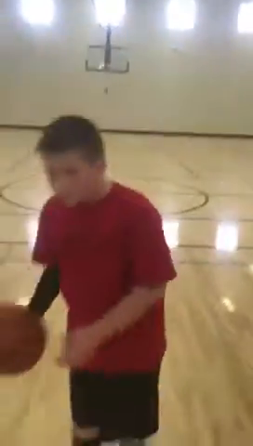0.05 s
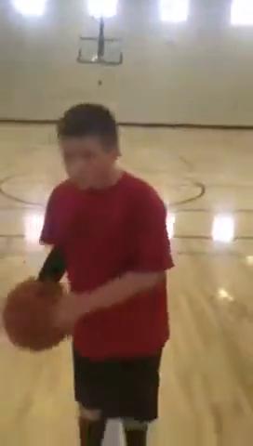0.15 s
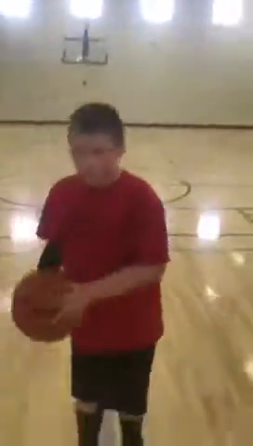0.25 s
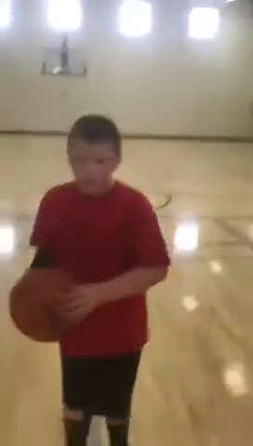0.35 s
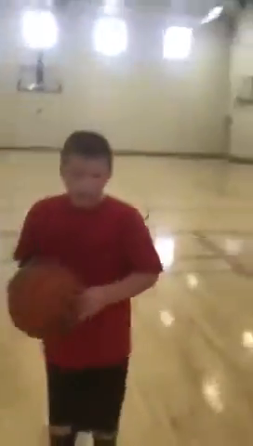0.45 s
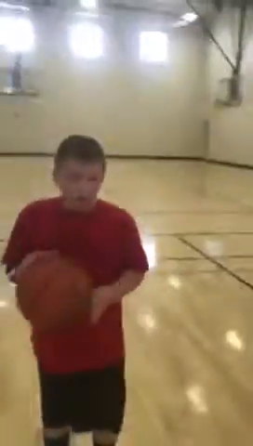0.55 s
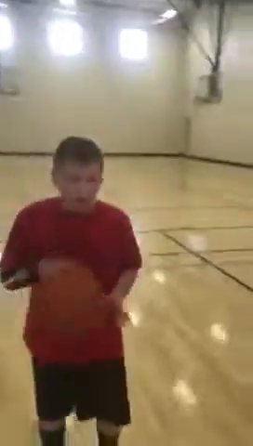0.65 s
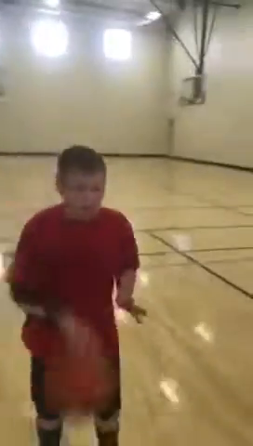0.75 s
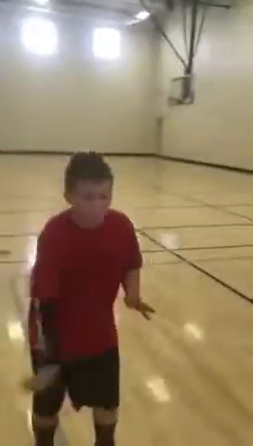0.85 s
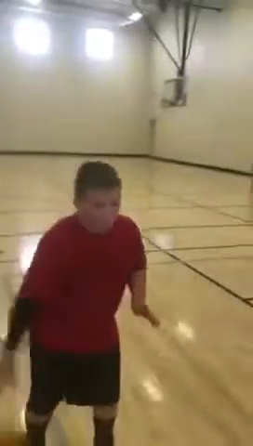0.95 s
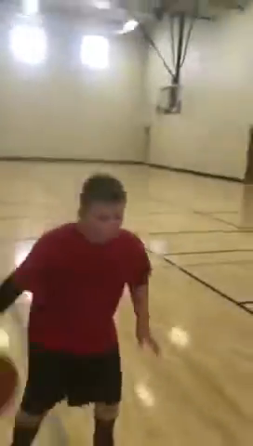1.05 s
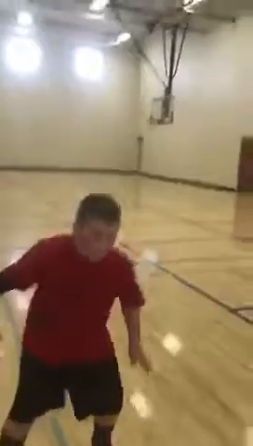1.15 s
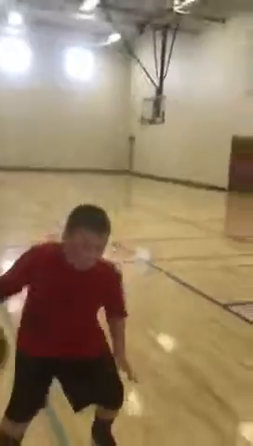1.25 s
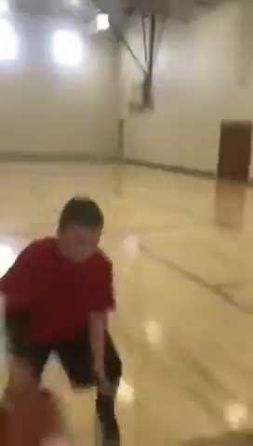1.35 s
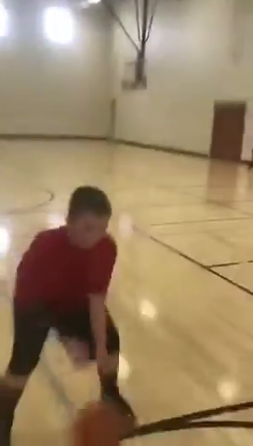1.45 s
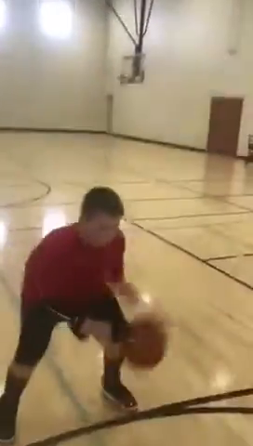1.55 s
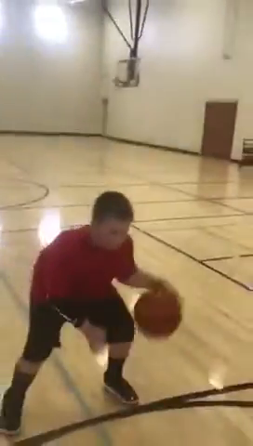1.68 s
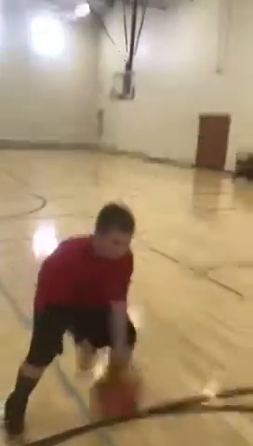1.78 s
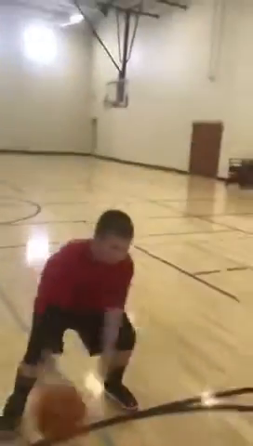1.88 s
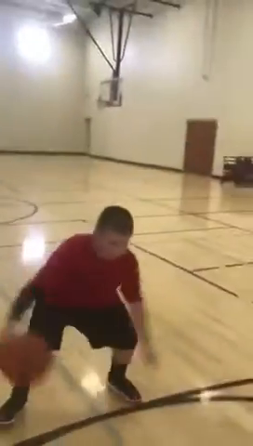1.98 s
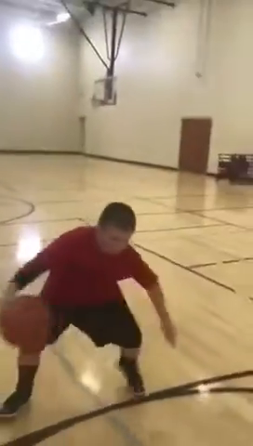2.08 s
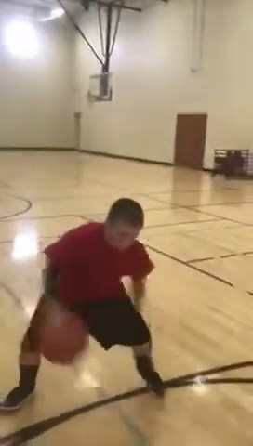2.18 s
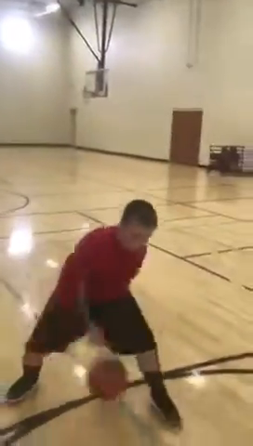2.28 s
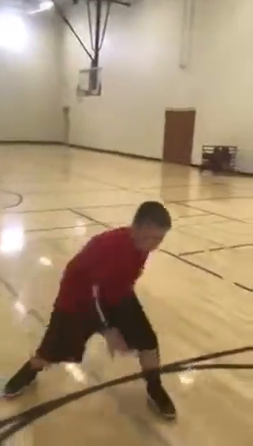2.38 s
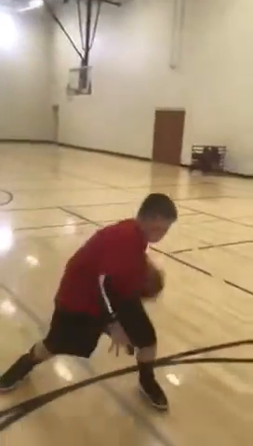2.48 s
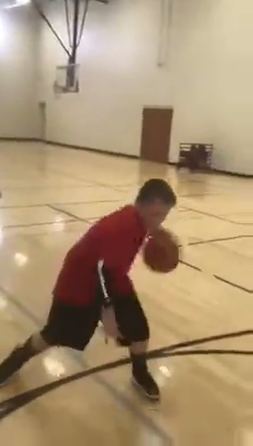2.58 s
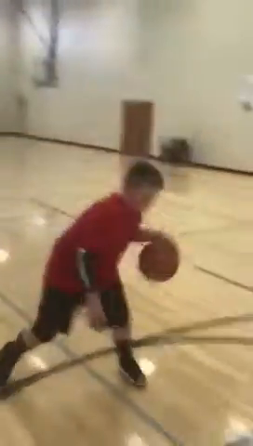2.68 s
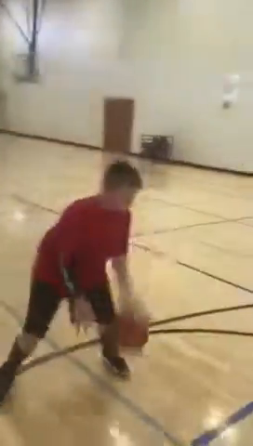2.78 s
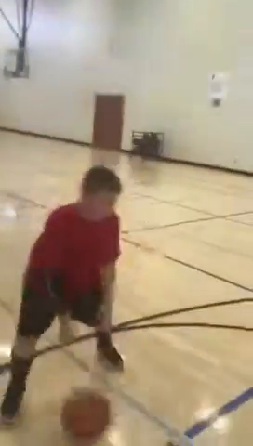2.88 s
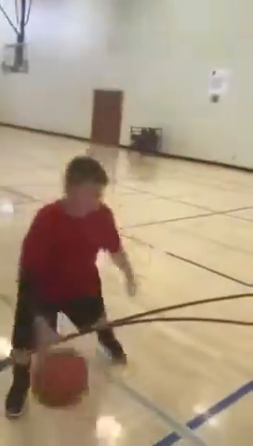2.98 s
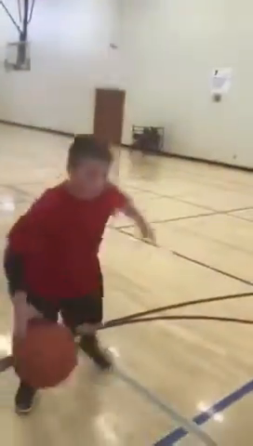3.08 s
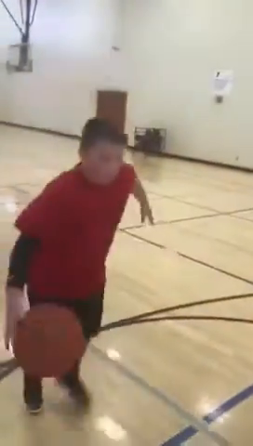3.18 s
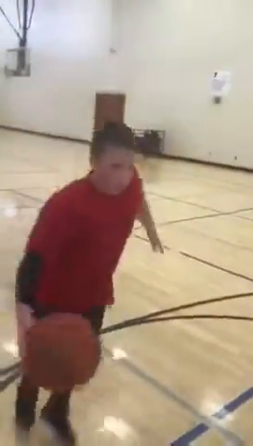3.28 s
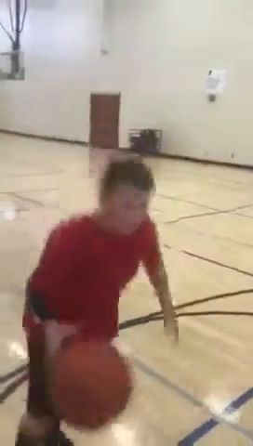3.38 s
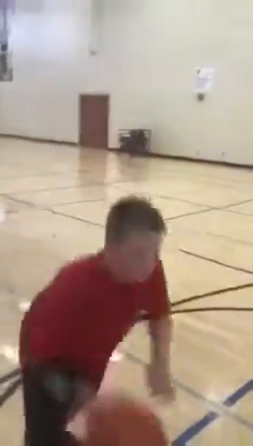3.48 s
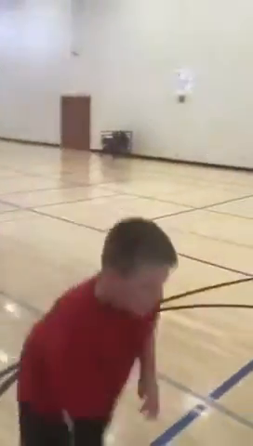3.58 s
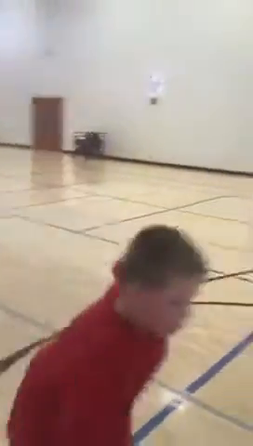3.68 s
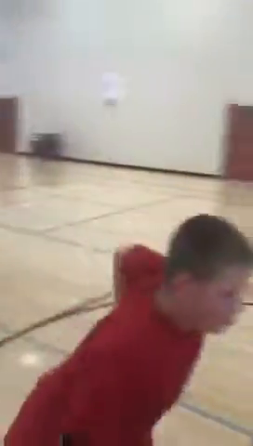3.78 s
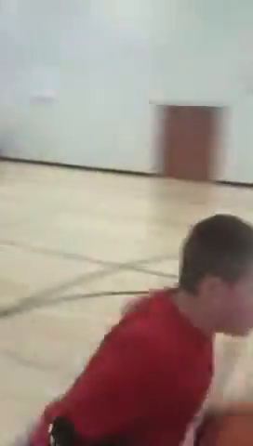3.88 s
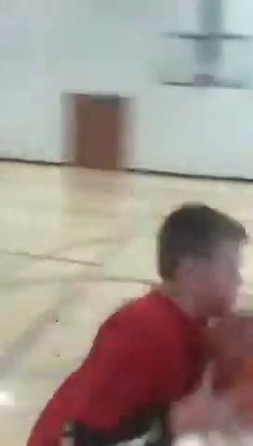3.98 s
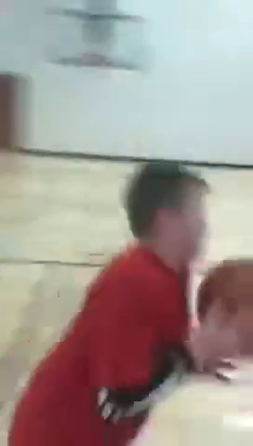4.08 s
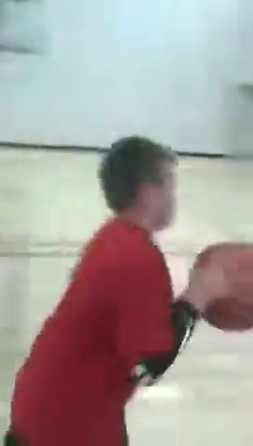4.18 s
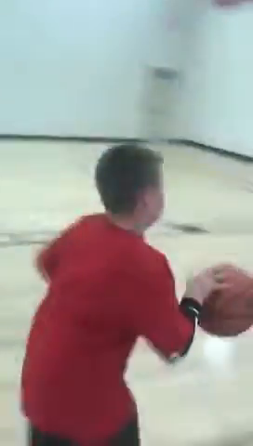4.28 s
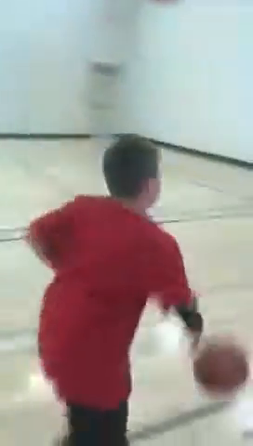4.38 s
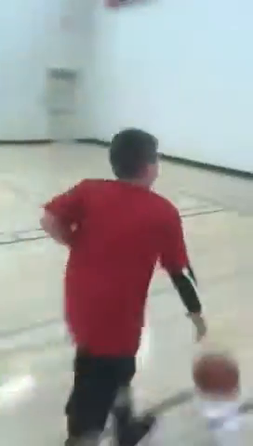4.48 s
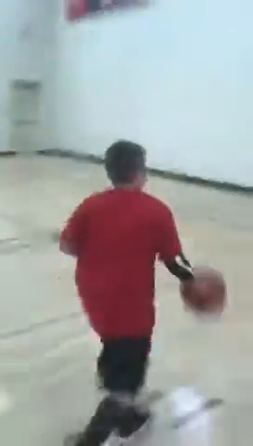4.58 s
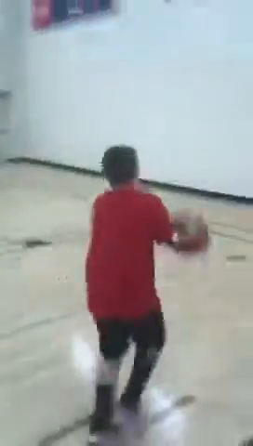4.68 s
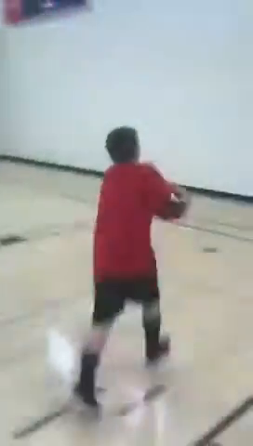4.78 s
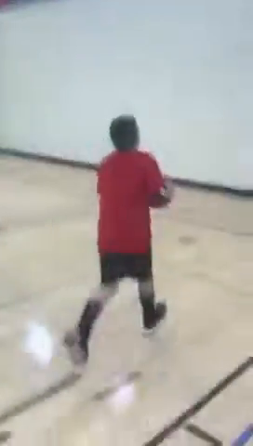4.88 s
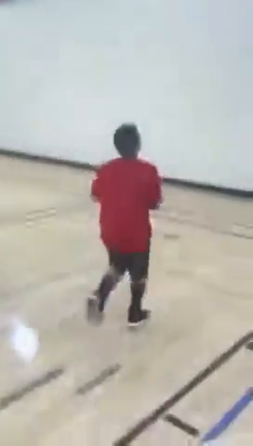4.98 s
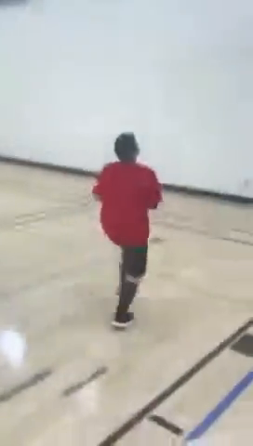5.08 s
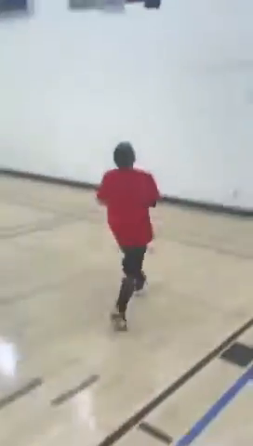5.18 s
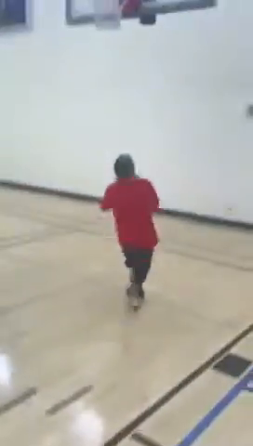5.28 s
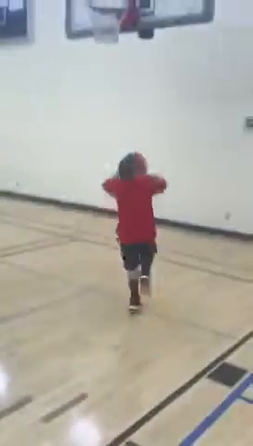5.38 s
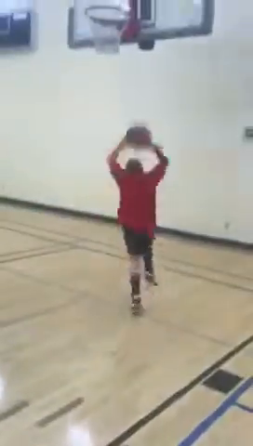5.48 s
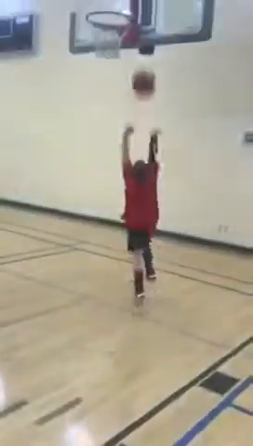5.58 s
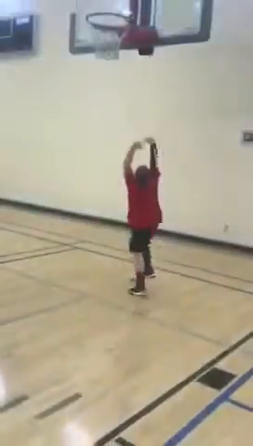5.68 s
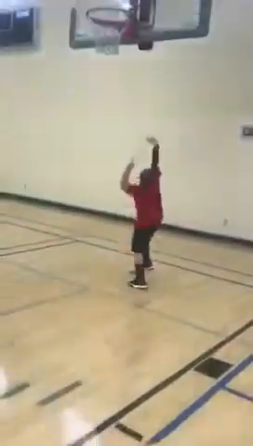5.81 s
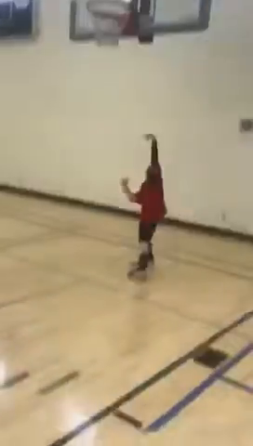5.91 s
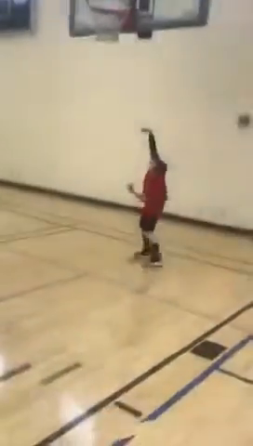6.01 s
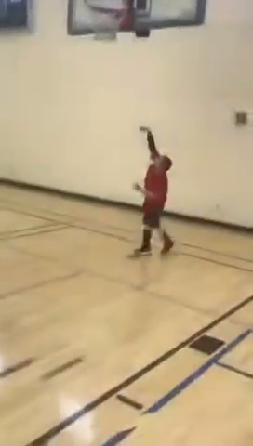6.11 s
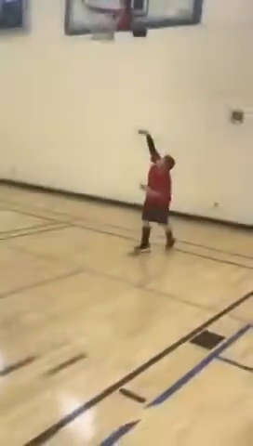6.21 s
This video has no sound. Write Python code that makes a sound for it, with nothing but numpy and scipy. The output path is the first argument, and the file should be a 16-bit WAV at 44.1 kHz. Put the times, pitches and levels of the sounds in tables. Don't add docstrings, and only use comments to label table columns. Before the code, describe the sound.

Close to a phone microphone, a basketball is dribbled on a sprung wooden gym floor. Seven loud bounces, roughly every half second and then more widely spaced, slap, thump and ring hollowly. Soft hand pats and shoe taps fall between them, with a short sole scuff just before the first bounce. The big hall keeps ringing over a low fluttering fan drone.

```python
import sys
import numpy as np
from scipy import signal
from scipy.fft import rfft, irfft, next_fast_len
from scipy.io import wavfile
from scipy.ndimage import uniform_filter1d

SR = 44100
rng = np.random.default_rng(int(sys.argv[2]) if len(sys.argv) > 2 else 0)


def ratio(d):
    e = np.asarray(d, float) / 20
    return 10 ** e


def pcm_store(signal):
    levels = np.round(np.clip(np.atleast_2d(signal), -1, 1) * 32767)
    wavfile.write(sys.argv[1], SR, levels.astype(np.int16).T)


N = 275625

# (time [s], slap level [dB], air ring [Hz], thump level [dB], hall level [dB])
BOUNCES = [
    (1.0136, -8, 1796, -4, -34.5),
    (1.5615, -8, 1626, -6, -38.5),
    (1.966, -6, 1708, -5.5, -41),
    (2.4389, -6.5, 1782, -10.5, -37.5),
    (3.0001, -8, 1714, -5, -38.5),
    (3.7469, -10.5, 1676, -3.5, -35),
    (4.5747, -3, 1600, -8, -33),
]
# (looseness of the boards [dB], bright edge level [dB])
SPOTS = [
    (0, -65.5),
    (-1, -63),
    (-11, -52),
    (-5, -40),
    (-1.5, -54.5),
    (5.5, -63),
    (2, -66),
]
# (time [s], hall level [dB])
EARLIER_BOUNCE = (-0.65, -31)
# (time [s], peak level [dB], pitch [Hz], low knock level [dB], pitched level [dB])
TAPS = [(0.104, -32.5, 1730, 7, 4), (0.565, -50, 501, -5, 1), (0.569, -35, 1620, -7, 4),
        (1.217, -40, 1730, -6, -6), (1.244, -34.5, 1850, 11, 10.5), (1.863, -30, 520, -14, 9.5),
        (2.386, -26.5, 807, 9, 8.5), (3.536, -32.5, 1850, -7, 0), (3.604, -27.5, 1780, 3, -14),
        (3.642, -32.5, 1810, 11, -5), (3.935, -35.5, 1710, -6, 9), (4.375, -32.5, 560, -8, 2),
        (5.374, -36, 2800, 0, -5), (5.945, -41, 630, 8.5, 5), (5.963, -36.5, 1640, 4, -6),
        (5.982, -38, 1200, -1, 0), (5.04, -35.5, 700, 0, -2)]
# (time [s], peak level [dB], pitch [Hz], low knock level [dB], pitched level [dB])
PALM = [
    (2.3845, -23, 2800, -6, 7),
    (2.3845, -24, 950, -20, 6),
    (2.3756, -33, 1800, -20, 4),
]
# (time [s], level [dB])
SCUFF = [
    (.9, -61),
    (.95, -46),
    (1.0, -37),
    (1.02, -83.5),
]
# (time [s], level [dB])
RUMBLE = [(0, -30), (.9, -32), (1.6, -33), (2.2, -37.5), (3.4, -39), (4, -30.5), (4.9, -35.5), (5.4, -29),
          (6.25, -33.5)]

# (frequency [Hz], level [dB], t60 [s])
SHELL = [(1225, -14.5, 0.0081), (2380, -13, 0.0042), (2640, -9.5, 0.014), (2945, -8, 0.011),
         (685, -14.5, 0.016), (1600, -11, 0.0022), (3320, -14.5, 0.0064), (3620, -30, 0.0068)]
# (frequency [Hz], level [dB per Hz])
CRACK = [(250, -31.5), (600, -7.5), (1000, -12.5), (1500, -13.5), (1790, 3), (2250, -14.5), (2900, -9),
         (4300, -42), (5000, -44.5), (5700, -35), (8200, -56.5), (9300, -76), (14000, -73.5), (16000, -80)]
# (frequency [Hz], level [dB per Hz])
RATTLE = [(150, -35.5), (300, -1), (620, 0), (900, -5.5), (1350, 0), (1800, -7), (2300, -12.5), (2900, -22),
          (4300, -37), (6000, -87.5)]
# (frequency [Hz], level [dB per Hz])
TICK = [(2000, -41), (4000, 9), (5700, 3), (7000, 4), (9200, -36.5), (13800, -23), (14500, -40.5),
        (16000, -51), (17000, -85)]
# (frequency [Hz], level [dB per Hz])
EDGE = [(6000, -58), (8500, -8), (10000, -2), (13600, 4), (14300, -17.5), (16000, -21), (17000, -58)]
# (frequency [Hz], level [dB per Hz])
HALL = [(40, -38.5), (100, -4.5), (250, -8.5), (380, -24), (600, -21.5), (800, -31.5), (1060, -18.5),
        (1200, -23), (1790, -12.5), (2250, -30.5), (2840, -21), (3600, -34), (4300, -42.5), (5000, -90.5)]
# (frequency [Hz], t60 [s])
LINGER = [(100, 6.25), (500, 4.1), (1800, 5.48), (3000, 2.9), (8000, 3.9)]
# (frequency [Hz], level [dB per Hz])
BLOOM = [(800, -36.5), (1060, -1.5), (1200, -11.5), (1350, 0), (1550, -15), (1780, 0.5), (2100, -23.5),
         (2850, -16.5)]
# (frequency [Hz], level [dB per Hz])
FANS = [(19, -34), (32, 2.5), (59, -4), (129, -1.5), (183, -14.5), (367, -22.5), (479, -30.5), (600, -26.5),
        (1360, -40.5), (1740, -29.5), (2270, -44.5), (2850, -37), (4290, -61.5), (5580, -79), (9440, -120)]
# (frequency [Hz], level [dB per Hz])
HISS = [(4000, -29), (4600, 1), (5000, -13), (5700, 0), (6500, -9.5), (7000, -10), (7600, -27), (8200, -6),
        (8700, -46)]
# (frequency [Hz], level [dB per Hz])
SHEEN = [(4200, -29), (4700, -5), (5100, -0.5), (6000, -1), (7500, -7.5), (8300, -3.5), (9150, -7),
         (9300, -60.5)]

PORT_HZ, PORT_WIDTH_HZ, CONTACT_S, SHELL_DB, GLINT_DB = 1772, 144, 0.0044, -17.5, -39
BOARD_HZ, BOARD_S, PANEL_DB, PANEL_DB_PER_S = 192.4, 0.013, -17.5, 3
RATTLE_DB, SNAP_DB, SNAP_GROWS, SNAP_S = -15.5, -21, 0.67, 0.0125
WALL_S, WALL_DB, WALL_THUMP_DB, WALL_DB_PER_S = 0.035, -12, -8, 12
CEILING_S, CEILING_DB, CEILING_THUMP_DB, CEILING_RING_DB = 0.046, -20.5, -16.5, -20.5
TAP_S, PALM_S = 0.013, 0.0061
BEAT_HZ, BEAT_TOP_S, BEAT_DB = 3.97, 0.11, 3.5
BLOOM_DB, BLOOM_GROWS, BLOOM_T60_S, BLOOM_RISE_S, STREAK_DB = -7, 0.89, 2.2, 0.068, 4.5
HISS_FLOOR_DB, HISS_OVER_HALL_DB, HISS_T60_S, HISS_RISE_S = -81, -35, 3.2, 0.12
SHEEN_DB, HOLD_S, OPEN_AT_START_S = -77, 0.42, 0.31
SWELL_S, SWELL_DB, REST_DB = 0.31, 1, -0.94


def unit(x):
    return x / np.sqrt(np.mean(x ** 2) + 1e-20)


def along(points, hz):
    f, v = np.transpose(points)
    return np.interp(np.log(hz + 1), np.log(f + 1), v)


def curve(rows):
    return np.interp(np.arange(N) / SR, *np.transpose(rows))


def add(track, s, sound):
    track[round(s * SR):][:len(sound)] += sound


def coloured(spectrum, size):
    m = next_fast_len(size + 8192)
    gain = ratio(along(spectrum, np.fft.rfftfreq(m, 1 / SR)))
    return unit(irfft(rfft(rng.standard_normal(m)) * gain, m)[:size])


def patches(shape, bands, frames, depth_db):
    field = uniform_filter1d(rng.standard_normal(shape), size=bands, axis=0)
    field = uniform_filter1d(field, size=frames, axis=1)
    return ratio(depth_db * unit(field))


def patchy(spectrum, bands, frames, depth_db):
    z = signal.stft(coloured(spectrum, N), nperseg=1024)[2]
    return unit(signal.istft(z * patches(z.shape, bands, frames, depth_db), nperseg=1024)[1][:N])


def decay(t, t60, attack):
    return ratio(-60 * t / t60) * (1 - np.exp(-(t / attack) ** 2))


def ring(t, hz, t60, attack):
    return np.sin(2 * np.pi * hz * t) * decay(t, t60, attack)


def burst(t, t60, attack, colour):
    m = 2 * len(t)
    cepstrum = irfft(np.log(ratio(along(colour, np.fft.rfftfreq(m, 1 / SR)))), m)
    cepstrum = cepstrum * np.r_[1, 2 * np.ones(len(t) - 1), np.zeros(len(t))]
    noise = rng.standard_normal(len(t)) * decay(t, t60, attack)
    rung = irfft(rfft(noise, m) * np.exp(rfft(cepstrum)), m)[:len(t)]
    return rung / np.max(np.abs(rung))


def ages():
    s, db = np.transpose([EARLIER_BOUNCE] + [(row[0], row[-1]) for row in BOUNCES])
    return np.maximum(np.arange(N) / SR - s[:, None], 0), db[:, None]


def ventilation():
    drone = coloured([(20, -84), (38, -20.5), (48, -5), (57, 1.5), (66, -5), (80, -54.5), (120, -120)], N)
    power = np.abs(uniform_filter1d(drone ** 2, SR // 10))
    drone = drone / np.sqrt(power + 0.099)
    beat = np.cos(2 * np.pi * BEAT_HZ * (np.arange(N) / SR - BEAT_TOP_S))
    return ratio(-31.5) * coloured(FANS, N) + ratio(curve(RUMBLE) + BEAT_DB * beat) * drone


def hall():
    hz, t, z = signal.stft(coloured(HALL, N), SR, nperseg=256)
    t60 = along(LINGER, hz)[:, None]
    energy = 1e-12
    for s, db in [EARLIER_BOUNCE] + [(row[0], row[-1]) for row in BOUNCES]:
        age = np.maximum(t - s, 0)
        energy = energy + ratio(2 * (db - 60 * age / t60)) * (1 - np.exp(-(age / 0.02) ** 2))
    clumps = patches(z.shape, 12, 3, depth_db=2)
    return signal.istft(z * np.sqrt(energy) * clumps, SR, nperseg=256)[1][:N]


def bloom():
    age, db = ages()
    loose_db = np.r_[0, np.transpose(SPOTS)[0]][:, None]
    level_db = db + BLOOM_DB + BLOOM_GROWS * loose_db - 60 * age / BLOOM_T60_S
    energy = np.sum(ratio(2 * level_db) * (1 - np.exp(-(age / BLOOM_RISE_S) ** 2)), axis=0)
    return np.sqrt(energy) * patchy(BLOOM + [(3500, -65)], 3, 5, STREAK_DB)


def treble_hiss():
    age, db = ages()
    level_db = db + HISS_OVER_HALL_DB - 60 * age / HISS_T60_S
    ringing = np.sum(ratio(2 * level_db) * (1 - np.exp(-(age / HISS_RISE_S) ** 2)), axis=0)
    held = np.any((age > 0) & (age < HOLD_S), axis=0) | (np.arange(N) < OPEN_AT_START_S * SR)
    gate = uniform_filter1d(1.0 * held, size=600)
    lower = np.sqrt(ringing + ratio(2 * HISS_FLOOR_DB)) * patchy(HISS, 4, 2, 5.5)
    return lower + ratio(SHEEN_DB) * (gate + 0.35) * patchy(SHEEN, 4, 2, 5.5)


def taps():
    track, t = np.zeros(N + SR), np.arange(SR // 4) / SR
    lives = [TAP_S] * len(TAPS) + [PALM_S] * len(PALM)
    for (s, db, hz, knock_db, pitched_db), life in zip(TAPS + PALM, lives):
        body = ratio(pitched_db) * ring(t, hz, 2.1 * life, 0.00063)
        push = ratio(knock_db + 3.5) * ring(t, 130, 0.084, 0.004)
        scrape = burst(t, 1.4 * life, 0.00079, CRACK) + ratio(1) * burst(t, 1.6 * life, 0.0014, RATTLE)
        tick = ratio(-29.5) * burst(t, 2.4 * life, 0.0007, TICK)
        add(track, s - 0.001, ratio(db) * (scrape + body + push + tick))
    return track[:N]


def scuff():
    return ratio(curve(SCUFF)) * coloured(CRACK, N)


def slap(t, hz, life, shell_db):
    shell = 0
    for f, db, t60 in SHELL:
        level = ratio(db + rng.normal(0, 0.98))
        shell = shell + level * ring(t, f * (1 + rng.normal(0, 0.039)), t60, 0.00036)
    air = ring(t, hz, 0.04, 0.00035) * (np.exp(-(t / life) ** 3) + 0.093)
    return ratio(shell_db + 10) * shell + ratio(-9) * burst(t, 0.004, 0.00015, CRACK) - ratio(1.5) * air


def thump(t, hz, life, panel_db):
    turns = 55 * t + (hz - 55) * 0.0105 * (1 - np.exp(-t / 0.0105))
    swell = 1 - np.exp(-t / 0.007)
    fade = np.exp(-(t / life) ** 2) + 0.24 * np.exp(-t / 0.018)
    return 1.185 * np.sin(2 * np.pi * turns) * swell * fade - ratio(panel_db) * ring(t, 250, 0.058, 0.0008)


def ball():
    track, t = np.zeros(N + SR), np.arange(SR // 4) / SR
    for (s, db, hz, thump_db, _), (loose_db, edge_db) in zip(BOUNCES, SPOTS):
        life = CONTACT_S / (1 + ((hz - PORT_HZ) / PORT_WIDTH_HZ) ** 2)
        shell_db = SHELL_DB - db
        far_db = WALL_DB_PER_S * (BOUNCES[-1][0] - s)
        boards = ratio(thump_db) * thump(t, BOARD_HZ, BOARD_S, PANEL_DB + PANEL_DB_PER_S * s)
        skin = ratio(db) * slap(t, hz, life, shell_db) + ratio(GLINT_DB + 0.5) * burst(t, 0.018, 0.00016, TICK)
        rattle = ratio(RATTLE_DB + loose_db) * burst(t, 0.054, 0.0021, RATTLE)
        edge = ratio(edge_db) * burst(t, 0.004, 0.00016, EDGE)
        snap = ratio(SNAP_DB + SNAP_GROWS * loose_db) * slap(t, 0.77 * hz, 0.0028, shell_db)
        wall = ratio(WALL_DB - far_db) * skin + ratio(WALL_THUMP_DB - far_db) * boards
        ceiling = ratio(db + CEILING_DB) * burst(t, 0.084, 0.0022, CRACK) + ratio(CEILING_THUMP_DB) * boards
        ceiling = ceiling + ratio(db + CEILING_RING_DB) * ring(t, PORT_HZ, 0.064, 0.0018)
        add(track, s, skin + rattle + edge)
        add(track, s + 0.0009, boards)
        add(track, s + SNAP_S, snap)
        add(track, s + WALL_S, wall)
        add(track, s + CEILING_S, ceiling)
    return track[:N]


def background_swell():
    u = ages()[0] / SWELL_S
    return ratio(REST_DB + SWELL_DB * np.sum(u * np.exp(1 - u), axis=0))


def scene():
    background = background_swell() * (ventilation() + hall() + bloom()) + treble_hiss()
    m = next_fast_len(N + SR)
    hz = np.fft.rfftfreq(m, 1 / SR)
    band = (hz < 9250) / (1 + (40 / (hz + 1)) ** 9)
    background = irfft(rfft(background, m) * band, m)[:N]
    return (background + taps() + scuff() + ball())[None]


def band_limit(x):
    return signal.sosfilt(signal.butter(12, 15800, fs=SR, output="sos"), x)


def record(dry):
    squashed = dry / (1 + np.abs(dry / 0.77) ** 6) ** (1 / 6)
    return band_limit(squashed)


dry = scene()
out = record(dry)
pcm_store(out)
```